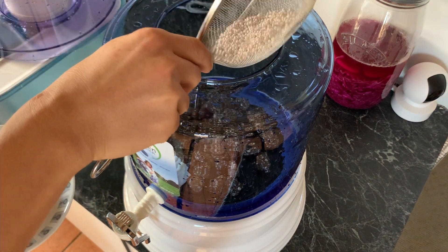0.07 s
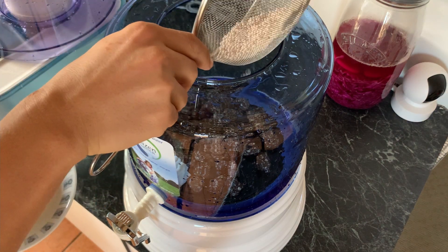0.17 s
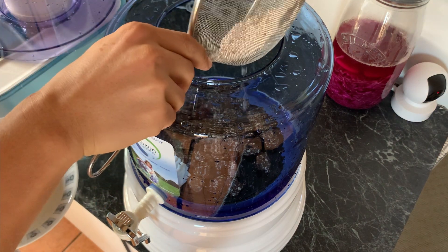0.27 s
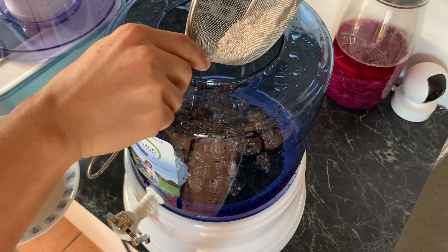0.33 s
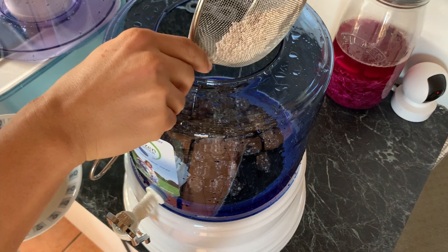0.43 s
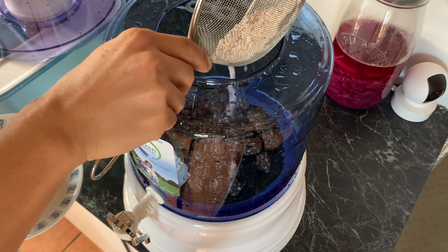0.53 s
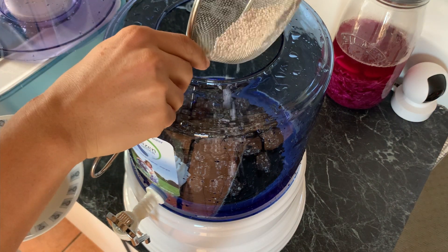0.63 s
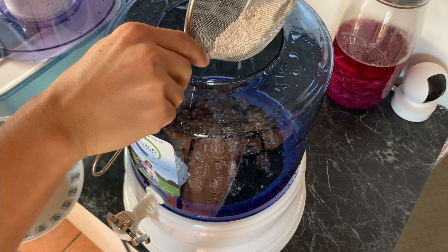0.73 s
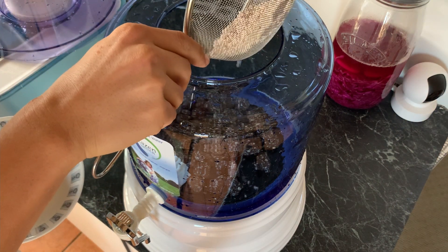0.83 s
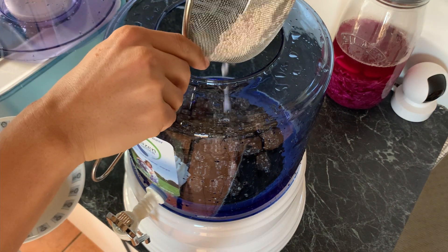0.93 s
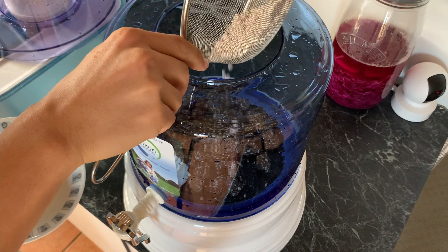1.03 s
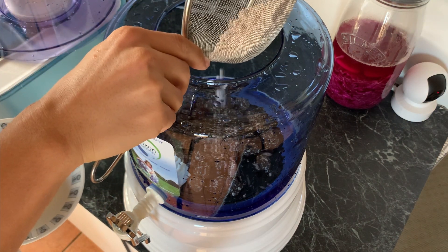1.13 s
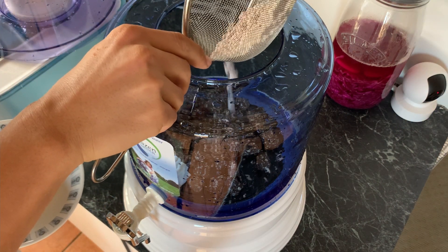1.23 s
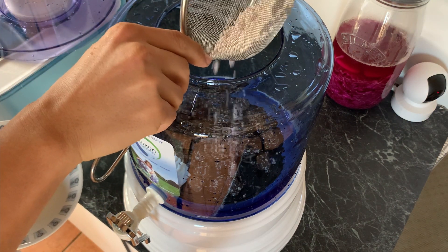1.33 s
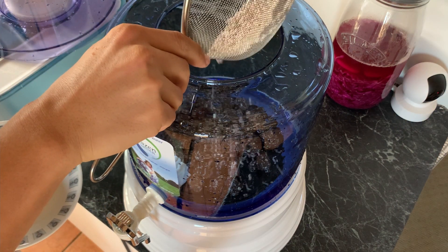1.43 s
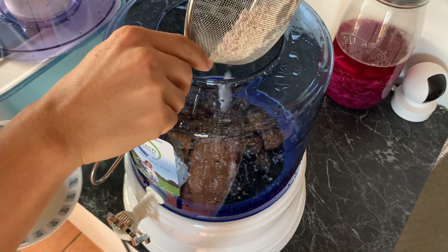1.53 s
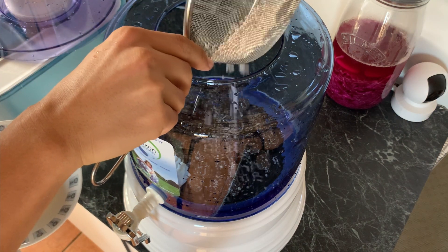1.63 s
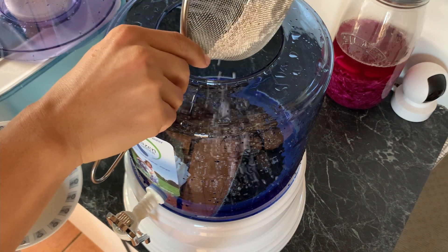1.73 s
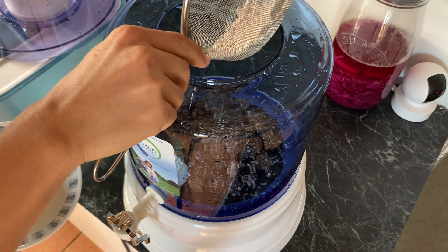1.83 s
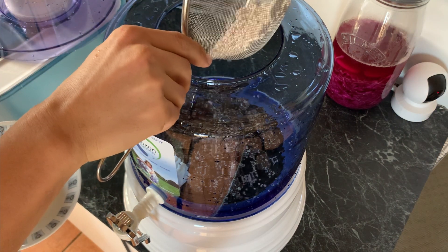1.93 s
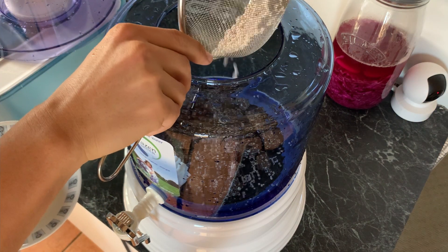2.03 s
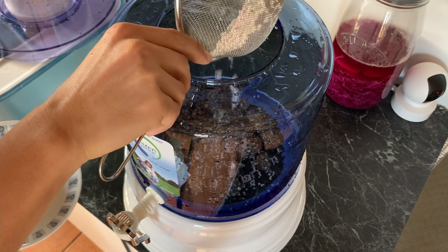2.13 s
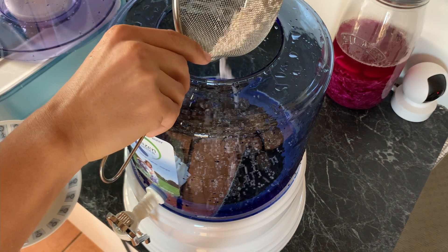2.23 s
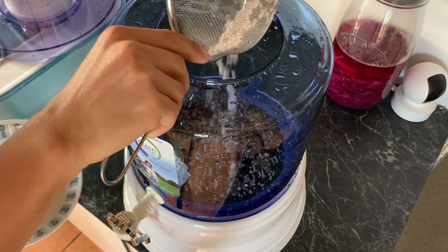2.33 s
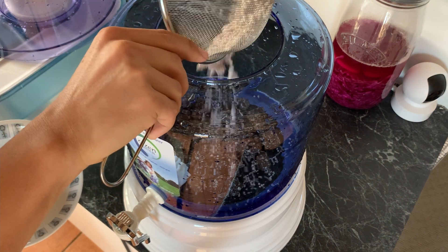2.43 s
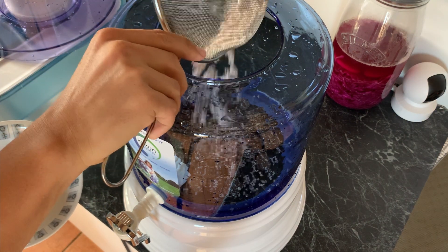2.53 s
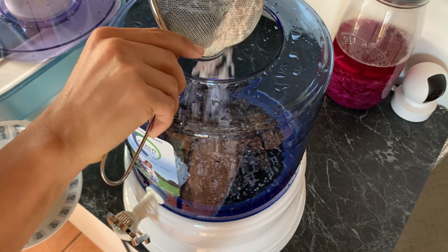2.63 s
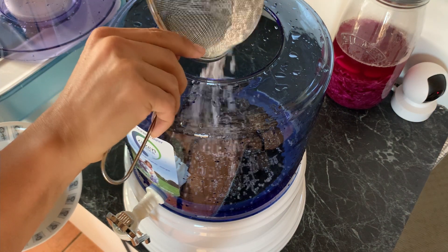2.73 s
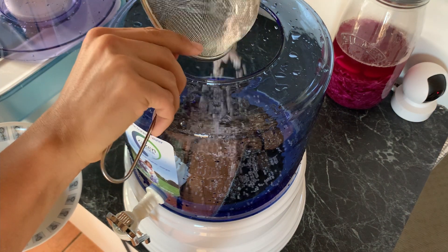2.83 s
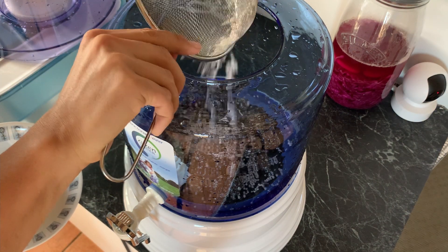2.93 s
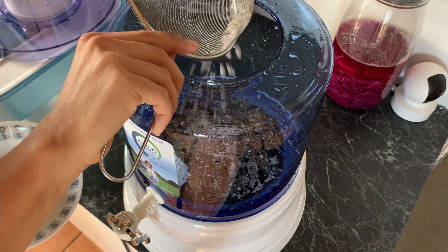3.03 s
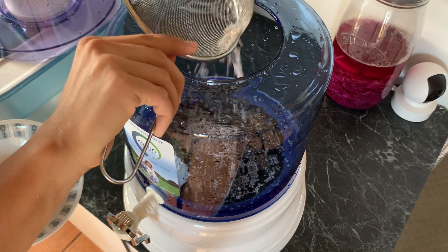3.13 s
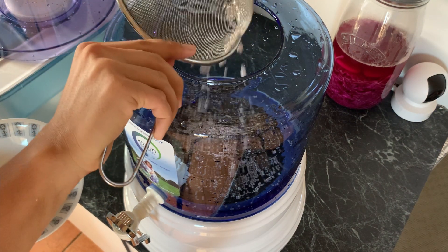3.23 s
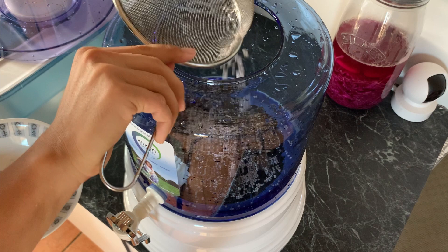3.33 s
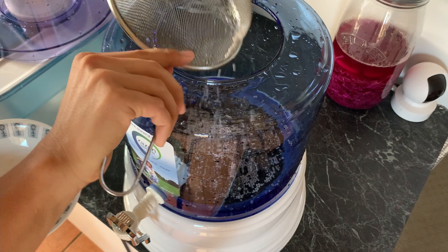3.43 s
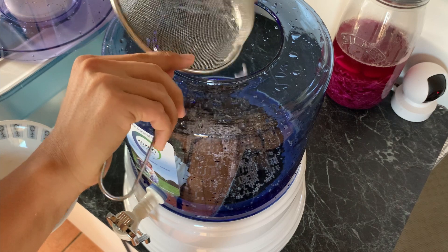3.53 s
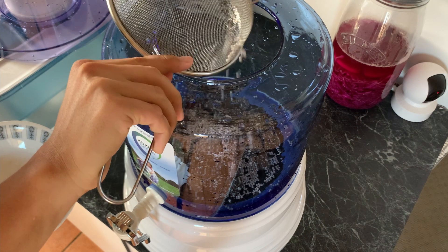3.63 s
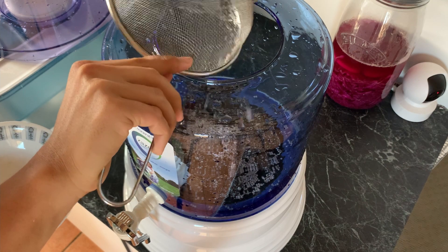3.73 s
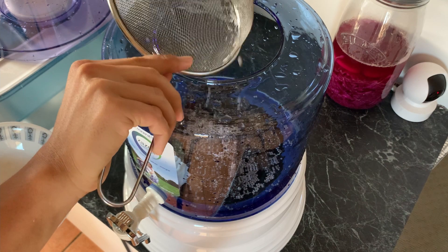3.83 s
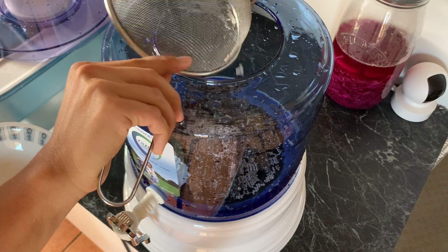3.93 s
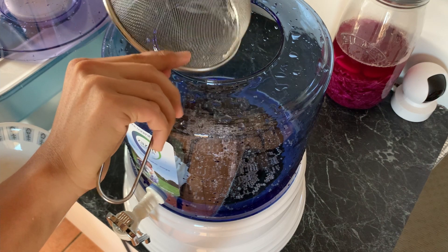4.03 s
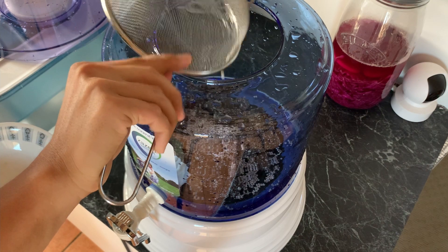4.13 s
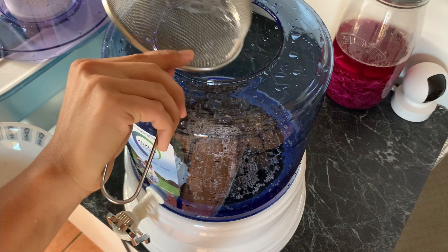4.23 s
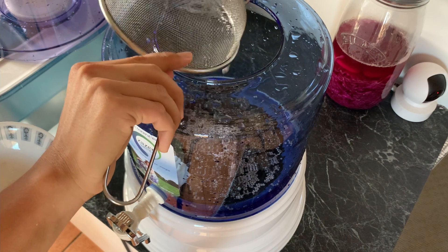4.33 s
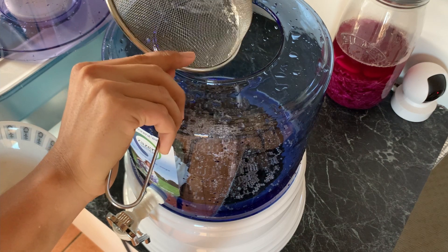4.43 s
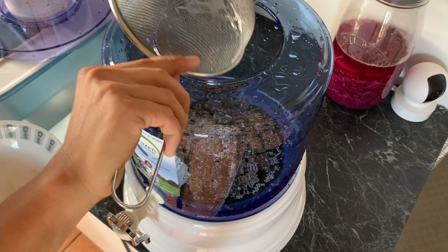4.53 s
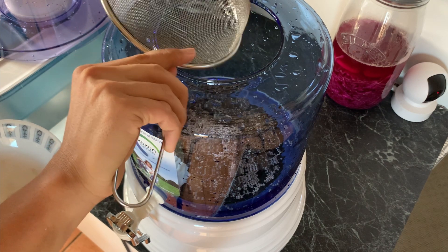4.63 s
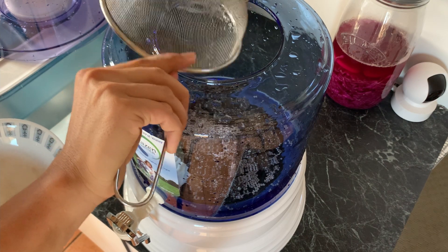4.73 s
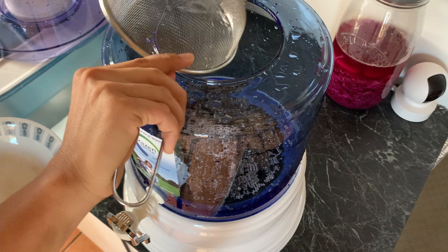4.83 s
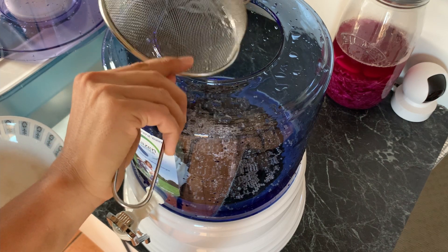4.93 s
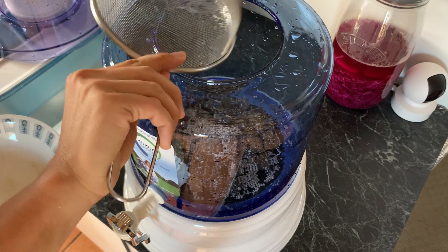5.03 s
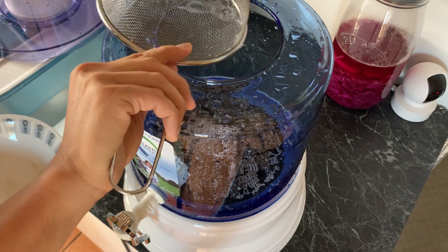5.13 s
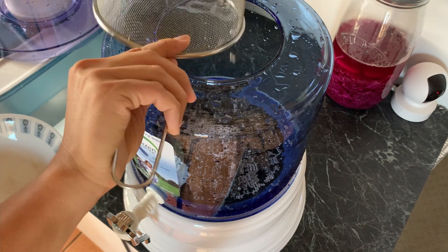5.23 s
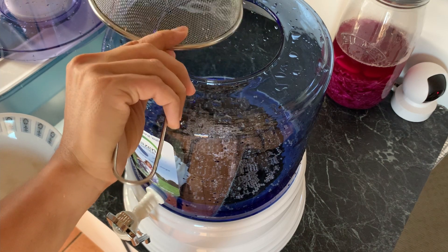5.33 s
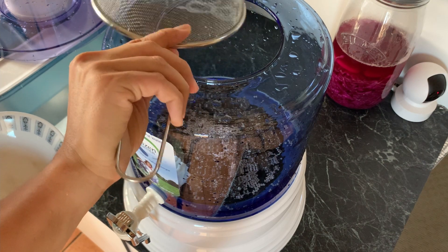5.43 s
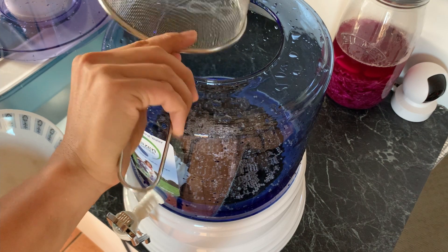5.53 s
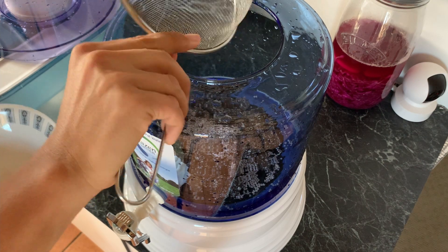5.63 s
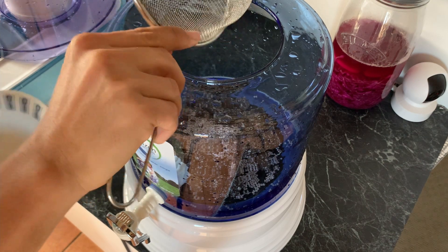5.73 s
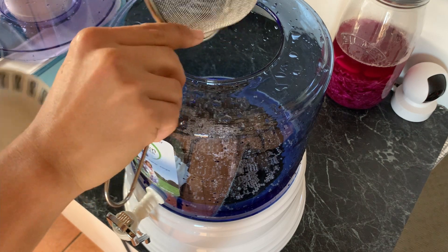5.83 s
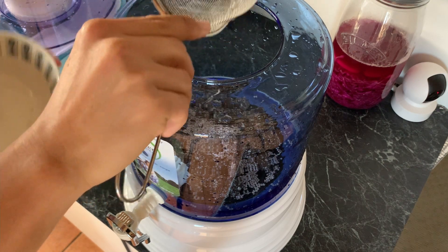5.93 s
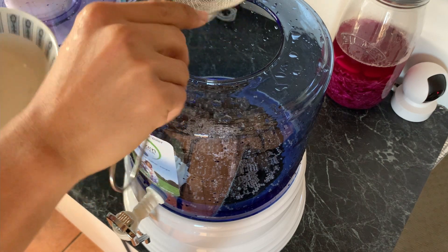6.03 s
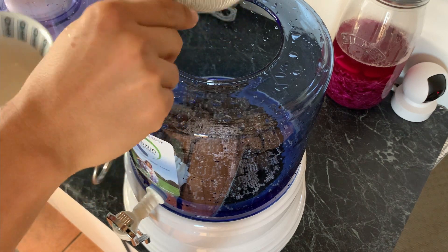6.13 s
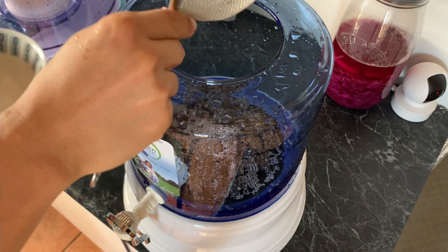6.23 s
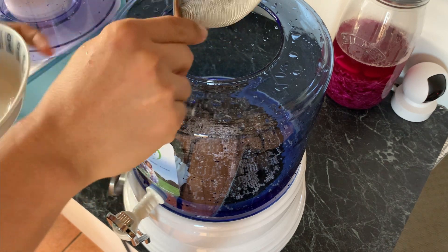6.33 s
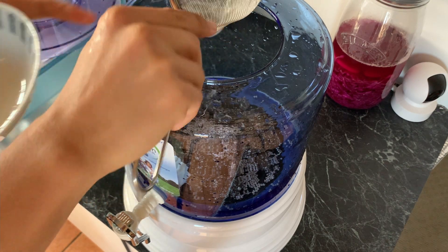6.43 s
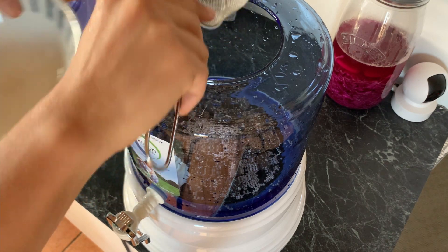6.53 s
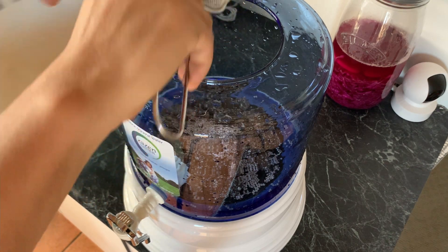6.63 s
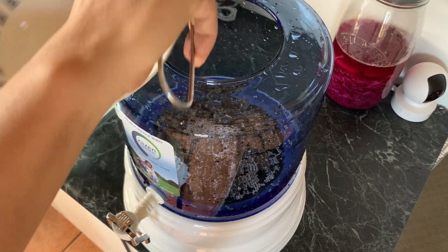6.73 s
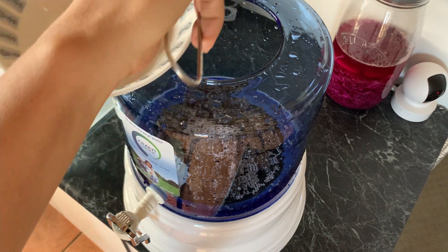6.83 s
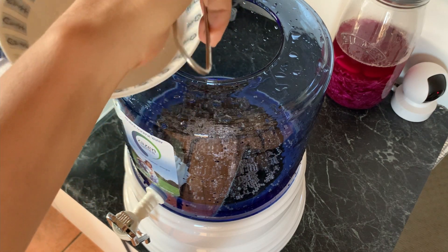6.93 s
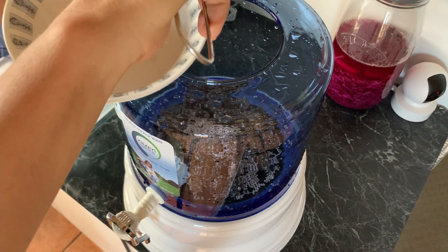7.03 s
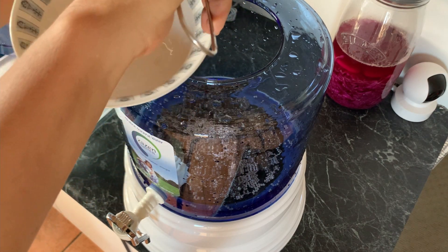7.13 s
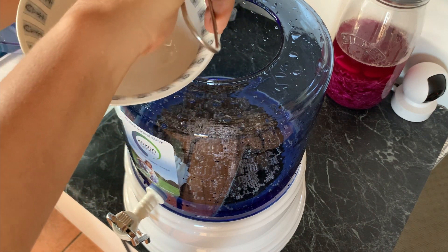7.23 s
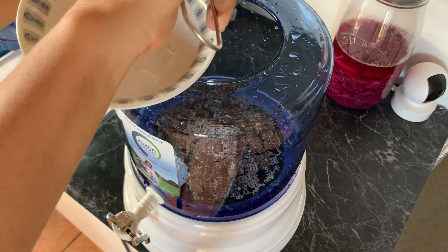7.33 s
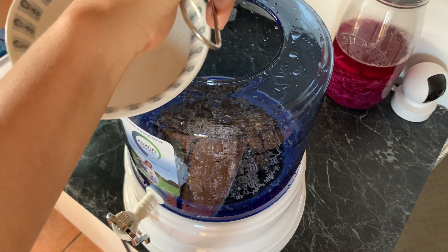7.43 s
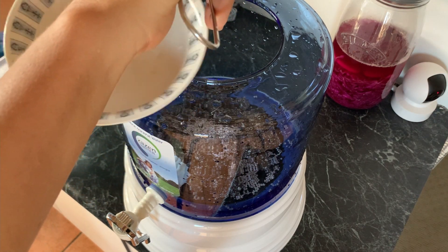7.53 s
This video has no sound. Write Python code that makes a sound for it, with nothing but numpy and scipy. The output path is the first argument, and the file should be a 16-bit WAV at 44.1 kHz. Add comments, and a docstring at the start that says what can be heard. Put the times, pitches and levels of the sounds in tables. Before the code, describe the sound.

A close microphone catches hard granules pouring through a jar's mouth onto wet stones: crisp hissing slides, dense tiny clicks and short glassy clinks. After the main pour, the metal rim is tapped quickly and repeatedly against the jar, rattling as the flow thins to stray ticks. Near silence with faint room rumble follows, then delicate ceramic touches and one low, soft counter knock with a tiny bounce.

```python
"""A wire strainer's rim clinks on a large glass jar as hard granules are shaken in: dying modes and bounces.
Grains sift over the mesh and patter on wet stones below, as coloured random clicks; the last tick singly.
Then a bowl comes up: light touches ring its modes, and its foot knocks softly on the counter.
Shaped noise makes the quiet kitchen, with a faint whine and low rumble; swept tones squeak, low notes thump.
The jar's inside and the kitchen answer the contacts through sparse, dying echoes."""
import sys
import numpy as np
from scipy import signal
from scipy.io import wavfile
from scipy.ndimage import uniform_filter1d

SR = 44100
rng = np.random.default_rng(int(sys.argv[2]) if len(sys.argv) > 2 else 0)


def log_audio(samples):
    """Write samples as a 16-bit WAV file to the path given in sys.argv[1]."""
    # one column per channel
    frames = np.atleast_2d(samples).T
    # limit to full scale, then quantise
    limited = np.clip(frames, -1, 1)
    pcm = np.round(limited * 32767).astype(np.int16)
    wavfile.write(sys.argv[1], SR, pcm)


N = 334068

# Bright spectrum of grains on the mesh. Each row: frequency in Hz, relative level in dB per Hz.
SIFT_SPECTRUM = [(2940, -43.5), (5000, -31.5), (5220, -13), (6020, -8), (6830, 4), (9050, 10.5),
                 (13200, 8.5), (15600, 9.5), (16300, -9)]
# Upper limits of the families of modes, from low to high. Each entry: frequency in Hz.
FAMILY_TOP_HZ = [1100, 1400, 2100, 3300, 4800]
POUR_END_S = 2.71  # the duller modes of the pouring give way to the free ones


def gain_of(db):
    """Decibels to a factor."""
    return 10 ** (np.asarray(db) / 20)


def evened(x):
    """Scales to rms 1."""
    return x / np.sqrt(np.mean(x ** 2) + 1e-20)


def peaked(x):
    """Scales to peak 1."""
    return x / (abs(x).max() + 1e-20)


def whole(x):
    """Scales to energy 1."""
    return x / np.linalg.norm(x)


def read(points, hz):
    """Reads a table on a log-frequency axis."""
    f, value = np.transpose(points)
    return np.interp(np.log(hz + 1), np.log(f + 1), value)


def curve(rows, column):
    """One dB column of a table as a gain for each sample."""
    rows = np.array(rows)
    return gain_of(np.interp(np.arange(N) / SR, rows[:, 0], rows[:, column]))


def add(mix, s, sound):
    """Mixes a sound in at a time in seconds."""
    part = mix[round(s * SR):][:len(sound)]
    part += sound[:len(part)]


def colour(x, points):
    """A causal (minimum-phase) filter with the given spectrum, so that clicks stay sharp."""
    hz = abs(np.fft.fftfreq(4096, 1 / SR))
    log_gain = np.log(gain_of(np.maximum(read(points, hz), -90)))
    taps = np.fft.ifft(np.exp(np.conj(signal.hilbert(log_gain)))).real
    return signal.oaconvolve(x, taps)[:len(x)]


def band(x, lo_hz, hi_hz):
    """Band-pass."""
    return signal.sosfilt(signal.butter(3, [lo_hz, hi_hz], "band", fs=SR, output="sos"), x)


def grains(count, per_s, spread_db):
    """Clicks of random sign at random moments; a wider spread makes a few large."""
    there, size, sign = rng.random((count, 3)).T
    click_gain = gain_of(spread_db * np.minimum(-np.log(size + 1e-9), 4))
    return (there < per_s / SR) * click_gain * np.sign(sign - .5)


def ring(modes, extra_db, seconds, rise_s=0.0013, detune=0.0023, waver_db=4.0):
    """Dying modes; tuning and phase shift with each call, and loose contact makes the ring waver."""
    hz, db, t60 = np.transpose(modes)[:, :, None]
    t = np.arange(round(seconds * SR)) / SR
    shift, start, beat, beat_start = rng.random((len(modes), 4)).T[:, :, None]
    waver = np.sin(2 * np.pi * ((15 + 35 * beat) * t + beat_start))  # 15 to 50 Hz
    tone = np.sin(2 * np.pi * (hz * (1 + detune * (2 * shift - 1)) * t + start))
    rise = np.sin(np.pi / 2 * np.minimum(t / rise_s, 1)) ** 2
    level_db = db + extra_db[:, None] - 60 * t / t60 + waver_db * waver
    return rise * (gain_of(level_db) * tone).sum(0)


def chatter(per_s, hold_s, t60):
    """A first contact and a flurry of small bounces that holds, then dies."""
    t = np.arange(6000) / SR
    burst = grains(count=len(t), per_s=per_s, spread_db=0.0)
    burst[0] = 0.65
    return burst * gain_of(-60 * np.maximum(t - hold_s, 0) / t60)


def pouring_at(s):
    """True while the duller modes of the pouring grains are heard."""
    pour_start_s = 0.087
    return (s > pour_start_s) & (s < POUR_END_S)


def ring_modes(pouring):
    """The free modes, or those heard while grains pour: duller middle modes of stones and jar struck by grains."""
    # Free glass jar and steel rim. Each row: frequency in Hz, relative level in dB, free t60 in seconds.
    free_table = [(906.1, 0, 0.23), (936, -6.5, 0.27), (1225, -5, 0.096), (1234, -11.5, 0.52),
                  (1630, -13.5, 0.22), (1738, -4.5, 0.49), (1769, -4.5, .12), (2190, -15, 0.13),
                  (2443, -14.5, 0.58), (2713, -2.5, 0.36), (2641, -4.5, 0.05), (3610, -16, 0.23),
                  (3868, 0, 0.2), (3910, -7, .12), (4350, -9, 0.15), (5150, -8, 0.1), (5420, -19, 0.2),
                  (6320, -2, 0.08), (6580, -1, .09), (7788, 2, 0.1), (8250, 1, 0.08), (8900, 1, .04),
                  (9295, 1, 0.09), (9950, 0, .05), (10850, 2, 0.085), (10935, 0, .08), (12240, -4, .08),
                  (12850, -2, .07), (13400, 1, .045), (13922, 3, 0.09), (14295, 2, .06), (14692, 1, .09),
                  (15300, -4, .07)]
    # Middle modes of stones and jar struck by grains. Each row: frequency in Hz, relative level in dB,
    # t60 in seconds.
    pouring_table = [(1680, -12, 0.14), (1716, -3.5, 0.12), (1857, -4, 0.19), (1890, -5, 0.13),
                     (2420, -5, 0.18), (2627, -3.5, 0.049), (2750, -10.5, 0.12), (3140, -2.5, .1),
                     (3390, -5.5, 0.14), (3830, -5.5, 0.16), (4310, -7.5, 0.21), (4400, -9.5, 0.19)]
    pouring_ring = 0.84  # factor on the free t60, for all but the lowest family
    modes = np.array(free_table)
    if not pouring:
        return modes
    low, second, *_, top = FAMILY_TOP_HZ
    shorter = modes.copy()
    shorter[modes[:, 0] > low, 2] *= pouring_ring
    return np.r_[shorter[modes[:, 0] < second], pouring_table, shorter[modes[:, 0] > top]]


def room(x):
    """Jar and kitchen: sparse taps of random sign, each band dying at its own speed."""
    # Decay of the echoes. Each row: frequency in Hz, t60 in seconds.
    room_decay = [(200, 0.42), (1000, 0.47), (4000, 0.46), (9000, 0.3), (16000, 0.21)]
    taps = np.zeros(SR // 2)
    at = np.arange(200, len(taps) - 20, 20)  # one tap in every 20 samples
    taps[at + rng.integers(0, 20, len(at))] = rng.choice([-1., 1.], len(at))
    hz, t, z = signal.stft(taps, SR, nperseg=256)
    decay = gain_of(-60 * t / read(room_decay, hz)[:, None])
    tail = signal.istft(z * decay, SR, nperseg=256)[1]
    return signal.oaconvolve(x, whole(tail))[:N]


def background():
    """Steady kitchen air and a faint whine as filtered noise, with a lumpy low rumble."""
    # Spectrum of the quiet kitchen. Each row: frequency in Hz, relative level in dB per Hz.
    air_spectrum = [(60, -34), (120, -6), (180, -0.5), (250, -13.5), (400, -11), (800, -20), (1500, -26),
                    (3200, -32.5), (16000, -48)]
    # Course of the low rumble. Each row: time in seconds, level in dB.
    rumble_course = [(0, -70.5), (.8, -67), (1.7, -63.5), (2.7, -59.5), (3.8, -63.5), (4.9, -67),
                     (5.4, -70.5), (7.58, -69)]
    # Spectrum of the rumble. Each row: frequency in Hz, relative level in dB per Hz.
    rumble_spectrum = [(20, -41), (35, -13.5), (60, 9), (100, -0.5), (200, -1.5), (300, -12.5),
                       (600, -11.5), (900, -40.5)]
    air = gain_of(-74.5) * evened(colour(rng.standard_normal(N), air_spectrum))
    whine = gain_of(-90.0) * evened(band(rng.standard_normal(N), 2860, 2960))
    lumps = evened(uniform_filter1d(rng.standard_normal(N), 3000))
    rumble = colour(rng.standard_normal(N), rumble_spectrum) * gain_of(1.5 * lumps)
    return air + whine + evened(rumble) * curve(rumble_course, 1)


def squeaks():
    """Faint gliding tones, roughened by slow noise, that swell and fade."""
    # Each row: start and end in seconds, start and end frequency in Hz, level in dB before the wavering.
    squeak_rows = [(0.798, 0.902, 308, 306, -58.5), (0.802, 0.91, 838, 755, -57.5),
                   (5.721, 6.123, 1053, 1083, -78.5), (6.443, 6.547, 1630, 1634, -83.5),
                   (6.544, 6.75, 1840, 1700, -81.5)]
    out = np.zeros(N)
    for start, end, start_hz, end_hz, db in squeak_rows:
        hz = np.linspace(start_hz, end_hz, round((end - start) * SR))
        fuzz = evened(uniform_filter1d(rng.standard_normal(len(hz)), 500))
        tone = np.sin(2 * np.pi * np.cumsum(hz) / SR)
        add(out, start, gain_of(db) * (1 + fuzz) * tone * np.hanning(len(hz)))
    return out


def thumps():
    """While the strainer is shaken: a short hollow note, then a soft lower push of band noise."""
    # Each row: start in seconds, relative level in dB.
    thump_rows = [(1.629, -46), (1.893, -44), (3.439, -53.5), (3.65, -45), (3.754, -39), (3.871, -44.5),
                  (3.961, -36.5), (4.175, -39.5), (4.314, -51), (4.586, -44.5), (4.727, -44), (4.937, -42),
                  (5.086, -40)]
    push_lag_s = 0.011  # the push follows the note
    out, t = np.zeros(N), np.arange(5000) / SR
    note = (1 - np.exp(-t / 0.0018)) * gain_of(-60 * t / 0.064) * np.sin(2 * np.pi * 225 * t)
    for s, db in thump_rows:
        push = evened(band(rng.standard_normal(len(t)), 45, 120))
        push = push * (1 - np.exp(-t / 0.0055)) * gain_of(-60 * t / 0.083)
        add(out, s, gain_of(db - 4.0) * peaked(note))
        add(out, s + push_lag_s, gain_of(db - 7.5) * peaked(push))
    return out


def bowl_knock():
    """The bowl's foot lands and bounces once: counter modes, a dry tick and a low buzz."""
    # Each row: start in seconds, relative level in dB, tick in dB relative to that level.
    knock_rows = [(7.367, -28, -20), (7.39, -41.5, -33)]
    # Modes of the counter. Each row: frequency in Hz, relative level in dB, t60 in seconds.
    counter_modes = [(108.6, -9, 0.28), (161.4, 1, 0.19), (268, -2, 0.18), (334, 4.5, 0.11),
                     (385, -1.5, 0.12), (461, -0.5, 0.083), (592, -13, .08), (692, -20, .08),
                     (856, -17, 0.052), (1590, -13, .06)]
    out = np.zeros(N)
    body = ring(counter_modes, np.zeros(len(counter_modes)), .3, rise_s=0.003)
    for s, db, tick_db in knock_rows:
        rocking = signal.oaconvolve(chatter(170, 0, .4), body)[:len(body)]  # the foot rocks as it settles
        tick = band(chatter(7300, 0.0035, 0.082), 630, 8900)
        buzz = band(chatter(3000, 0.0091, 0.38), 123, 990)  # loose things on the counter buzz along
        add(out, s, gain_of(db - 4.0) * peaked(body + .45 * rocking))
        add(out, s, gain_of(db + tick_db) * peaked(tick))
        add(out, s, gain_of(db - 19.5) * peaked(buzz))
    return out


def bowl_touches():
    """The bowl touches strainer or jar: ceramic modes, small bounces in two bands and a duller body."""
    # Each row: start in seconds, relative level in dB, treble and dull part in dB relative to that level.
    touch_rows = [(6.8144, -66.5, 10.5, -1), (7.0409, -56, 2, -19), (7.172, -59, -6, 12),
                  (7.1851, -46.5, 4, -5), (7.254, -70, 11, -6), (7.2639, -50, 13.5, -6),
                  (7.3244, -74, 11, -6), (7.3444, -69, 14, -6), (7.43, -78, 14, -6.5)]
    # Modes of the bowl. Each row: frequency in Hz, relative level in dB before scatter, t60 in seconds.
    bowl_modes = [(2222, -2, 0.13), (3590, 2, 0.09), (5255, -7, .08), (7300, 0, 0.05)]
    # Duller body of a touch. Each row: frequency in Hz, relative level in dB, t60 in seconds.
    dull_modes = [(480, -9, .05), (760, -8, .05), (990, -2, .07), (1180, 0, .05), (1570, -13, .04)]
    out = np.zeros(N)
    for s, db, treble_db, dull_db in touch_rows:
        burst = chatter(2600, 0.0024, 0.037)
        ceramic = ring(bowl_modes, 3.6 * rng.standard_normal(len(bowl_modes)), .3)
        dull_ring = ring(dull_modes, np.zeros(len(dull_modes)), 0.28)
        dull = signal.oaconvolve(chatter(900, 0.0078, 0.11), dull_ring)
        add(out, s, gain_of(db - 7.0) * peaked(ceramic))
        add(out, s, gain_of(db - 5.0) * peaked(band(burst, 650, 4500)))
        add(out, s, gain_of(db + treble_db) * peaked(band(burst, 7900, 12100)))
        add(out, s, gain_of(db + dull_db) * peaked(dull))
    return out


def flow():
    """Dense grains in clumps: bright on the mesh, darker on the stones, where they also wake stones and jar."""
    # Course of the flow. Each row: time in seconds, sifting on the mesh in dB, patter in the jar in dB.
    flow_course = [(0, -36.5, -53), (0.24, -68.5, -64.5), (0.45, -48.5, -65.5), (0.55, -48, -60.5),
                   (0.595, -79, -88), (0.63, -49, -44.5), (0.75, -36, -49), (1.02, -41, -56),
                   (1.2, -37.5, -49.5), (1.45, -32, -43.5), (1.6, -31.5, -46.5), (1.85, -29.5, -40),
                   (1.95, -38.5, -55.5), (2.15, -38.5, -47), (2.4, -30.5, -43), (2.65, -25.5, -38.5),
                   (2.95, -29.5, -43.5), (3.05, -32, -44.5), (3.2, -32.5, -45), (3.5, -35, -48.5),
                   (3.62, -44.5, -62), (3.74, -39, -48.5), (4.7, -61, -59.5), (5.05, -55, -49),
                   (5.7, -60, -71), (5.9, -91.5, -88)]
    # Spectrum of the patter. Each row: frequency in Hz, relative level in dB per Hz.
    patter_spectrum = [(180, -53), (300, -19.5), (740, -10), (905, -7.5), (1090, -26.5), (1200, -15),
                       (1420, -18.5), (1650, -2.5), (1920, -1), (2150, -10), (2340, -19), (2420, 0.5),
                       (2810, -1), (5970, -2), (7500, -7), (9750, -6), (16500, -120)]
    # The larger slides over the mesh. Each row: crest in seconds, relative size.
    slide_rows = [(.733, .9), (0.831, .75), (.854, .5), (.89, .5), (1.257, 1.15), (1.502, .5), (1.563, .45),
                  (2.274, 1.05), (3.377, .45)]
    surges_per_s, surge_s, steady_share = 27, 0.032, 1  # small slides over the mesh, on a steady flow
    lift_s = 5.35  # the rim leaves the glass
    t = np.arange(N) / SR
    clumps = uniform_filter1d(uniform_filter1d(rng.standard_normal((2, N)), 500, axis=1), 300, axis=1)
    clumps = evened(clumps)

    crests = .3 * abs(grains(count=N, per_s=surges_per_s, spread_db=1.1))
    for s, size in slide_rows:
        add(crests, s, np.array([1.3 * size]))
    slide = np.hanning(round(surge_s * SR))
    surges = steady_share + signal.oaconvolve(crests, slide, "same")
    on_mesh = grains(count=N, per_s=11000, spread_db=3.0) * surges * gain_of(1.3 * clumps[0])
    sift = evened(colour(on_mesh, SIFT_SPECTRUM))

    fall = grains(count=N, per_s=3500, spread_db=4.2) * gain_of(1.5 * clumps[0] + 1.8 * clumps[1])
    fall = fall * curve(flow_course, 2) / np.std(colour(fall, patter_spectrum))
    patter = colour(fall, patter_spectrum)
    pour = pouring_at(t)
    for share, pouring in ((pour, True), (~pour & (t < lift_s), False)):
        modes = ring_modes(pouring)
        modes = modes[modes[:, 0] < FAMILY_TOP_HZ[-1]]
        woken = band(ring(modes, np.zeros(len(modes)), 0.45), 450, 6800)
        patter = patter + gain_of(-50) * signal.oaconvolve(fall * share, woken)[:N]
    fade = np.clip((6.5 - t) / 0.23, 0, 1)  # the strainer is empty
    return (sift * curve(flow_course, 1) + patter) * fade


def ticks():
    """Grains landing singly or in small clumps: a sharp contact, then a short bright flurry with a little body."""
    # Each row: start in seconds, relative level in dB.
    tick_rows = [(0.2628, -38), (0.282, -34.5), (0.3037, -38), (0.3174, -49), (0.338, -56), (0.374, -52),
                 (0.418, -42), (0.449, -32), (0.468, -31.5), (0.503, -36), (0.701, -23), (1.1196, -15.5),
                 (2.0165, -18), (2.089, -23), (2.336, -17), (2.868, -20), (3.003, -17), (3.046, -27),
                 (3.077, -18), (3.493, -15), (3.33, -16), (3.822, -19), (3.947, -20), (4.397, -27.5),
                 (4.4816, -24), (4.6332, -23.5), (4.678, -30), (4.791, -28), (5.001, -29), (5.0419, -37),
                 (5.21, -29), (5.3244, -31), (5.368, -32.5), (5.399, -32), (5.4333, -23), (5.516, -32.5),
                 (5.542, -30.5), (5.585, -25.5), (5.6725, -29), (5.7216, -40), (5.7447, -30), (5.8017, -33),
                 (5.8442, -39.5), (5.913, -46.5), (5.956, -36), (6.0588, -36), (6.166, -38.5),
                 (6.209, -45.5), (6.2464, -48), (6.2766, -51), (6.305, -46.5), (6.433, -49), (6.4965, -52),]
    out = np.zeros(N)
    for s, db in tick_rows:
        t60 = np.interp(db, [-50, -25], [.03, .06])  # bigger clumps scatter longer
        burst = chatter(3700, 0.0014, t60)
        burst[0] *= gain_of(-3.5)
        bright = peaked(colour(burst, SIFT_SPECTRUM))
        body = peaked(band(burst, 2500, 5500))
        add(out, s, gain_of(db - 1.0) * (bright + gain_of(-22.0) * body))
    return out


def clinks():
    """Each hard blow of the rim, or clump of grains landing on stones and jar, rings, clatters and rattles."""
    # Each row: start in seconds, relative levels of clatter, rattle and ring in dB,
    # colour of the ring: an angle in degrees that sets the balance of the mode families.
    clink_rows = [(0.014, -8.5, -13, -18, 110), (0.612, -40, -34.5, -32, 126), (0.63, -35, -33, -35, 18),
                  (0.749, -23, -31, -30.5, 108), (1.024, -21, -27.5, -39, 45),
                  (1.065, -22.5, -42, -36.5, 177), (1.152, -44, -34, -37.5, 134),
                  (1.232, -53, -29.5, -38, 63), (1.337, -46, -42, -31, 69), (1.63, -29, -21, -28.5, 125),
                  (1.705, -33.5, -32.5, -34, 17), (1.779, -37.5, -26, -24, 8),
                  (1.893, -10.5, -13, -20.5, 108), (2.059, -44, -38, -37, 28), (2.177, -39, -25, -32.5, 15),
                  (2.239, -42.5, -26.5, -37, 134), (2.378, -35.5, -35.5, -30, 68),
                  (2.502, -21.5, -42, -28, 66), (2.622, -29.5, -24.5, -32, 66),
                  (2.699, -22, -30.5, -31, 66), (2.726, -11.5, -16, -15, 102),
                  (2.813, -10.5, -15, -20, 153), (2.915, -9, -19.5, -16.5, 110),
                  (3.115, -22.5, -53.5, -25, 109), (3.226, -9, -16.5, -20.5, 104),
                  (3.564, -13, -12.5, -22, 175), (3.646, -21, -25.5, -31, 39),
                  (3.757, -17.5, -20, -25.5, 147), (3.878, -23, -27, -25, 106),
                  (3.894, -18, -16.0, -24.5, 99), (3.962, -8, -16, -27.5, 138),
                  (4.002, -17.5, -15, -21, 99), (4.111, -12.5, -15, -22.5, 174),
                  (4.178, -12.5, -17.5, -23, 76), (4.218, -12.5, -14.5, -22.5, 81),
                  (4.324, -15.5, -17, -21, 175), (4.556, -37.5, -26, -28.5, 111), (4.58, -19, -26, -29, 1),
                  (4.724, -9.5, -14, -22.5, 4), (4.862, -13, -15, -21, 100), (4.94, -17, -24.5, -25.5, 111),
                  (5.08, -9.5, -13.5, -21.5, 100), (5.234, -24, -31.5, -27, 46)]
    # Spectrum of the clatter. Each row: frequency in Hz, relative level in dB per Hz.
    clatter_spectrum = [(600, -44.5), (800, -13), (900, -6), (1250, 0.5), (1450, -8), (1850, -4),
                        (2200, -16.5), (2700, -0.5), (3300, -10.5), (3900, 2), (4400, -12.5), (5200, -2),
                        (5900, -16.5), (6400, -11), (7000, -33)]
    # Spectrum of the rattle. Each row: frequency in Hz, relative level in dB per Hz.
    rattle_spectrum = [(5000, -25), (5900, -44.5), (6400, -7), (7800, -2.5), (9600, -1.5), (12000, -4.5),
                       (14700, -12), (16900, -3)]
    # Each entry, one per family of modes: factor on the colour angle.
    angle_factor = [2, 3, 4, 5, 6]
    # Each entry, one per family of modes: relative level in dB.
    family_level_db = [-12.5, -5.5, -7, -3.5, -7]
    # Each entry, one per family of modes: offset of the colour angle in degrees.
    angle_offset_deg = [79.8, 69, 9, 92, 350]
    floor_db, top_ring_db = -15, -16  # least share of a family; highest modes relative to the rattle
    scatter_db, top_scatter_db = 2.0, 4.0  # random balance of the modes in each contact
    short_until_s, short_ring = 3.4, 0.61  # after the pouring, rings stay shorter until then: t60 factor
    rings, noisy = np.zeros(N), np.zeros(N)
    for s, clatter_db, rattle_db, ring_db, colour_deg in clink_rows:
        modes = ring_modes(pouring_at(s))
        if POUR_END_S < s < short_until_s:
            modes[:, 2] *= short_ring
        family = np.searchsorted(FAMILY_TOP_HZ, modes[:, 0])
        balance = np.cos(np.radians(np.multiply(angle_factor, colour_deg) + angle_offset_deg))
        balance_db = 10 * np.log10(balance ** 2 + gain_of(floor_db) ** 2)
        family_db = ring_db + np.array(family_level_db) + balance_db
        share_db = np.append(family_db, rattle_db + top_ring_db)[family]
        spread_db = np.where(family < len(family_level_db), scatter_db, top_scatter_db)
        share_db += spread_db * rng.standard_normal(len(modes))
        clatter = whole(colour(chatter(2900, 0.005, 0.078), clatter_spectrum))
        rattle = whole(colour(chatter(5000, 0.0067, 0.042), rattle_spectrum))
        add(rings, s, ring(modes, share_db, 0.63))
        add(noisy, s, gain_of(clatter_db + 8.0) * clatter)
        add(noisy, s, gain_of(rattle_db + 21.5) * rattle)
    return band(rings, 570, 18000), noisy  # small hard things radiate no bass


def scene():
    """All sources; the jar's inside and the kitchen answer the noisy contacts and the bowl."""
    rings, noisy = clinks()
    contacts = noisy + ticks() + flow() + bowl_touches() + bowl_knock()
    answered = contacts + gain_of(-7.0) * room(contacts)
    return (rings + answered + thumps() + squeaks() + background())[None]


def record(dry):
    """The top treble steps down by 24 dB, then the band limit: two low-pass filters combined."""
    dull_hz, edge_hz = 15900, 16900
    below = signal.firwin(511, dull_hz, window=("kaiser", 9), fs=SR)
    edge = signal.firwin(511, edge_hz, window=("kaiser", 9), fs=SR)
    return signal.oaconvolve(dry, (below + gain_of(-24) * (edge - below))[None], "same")


dry = scene()
out = record(dry)
log_audio(out)
```